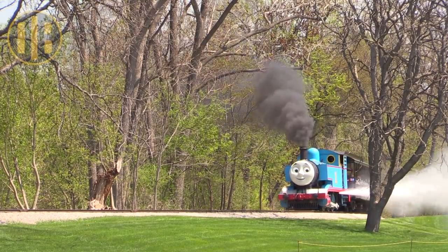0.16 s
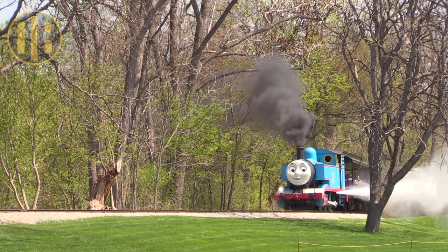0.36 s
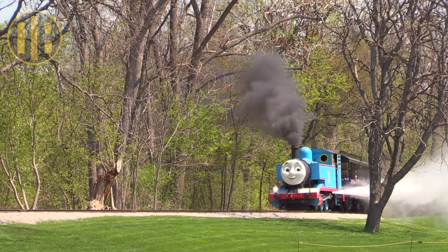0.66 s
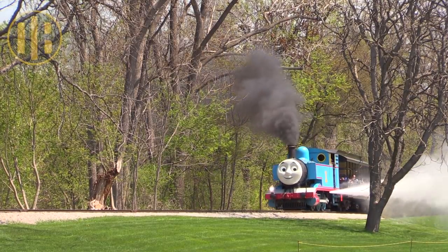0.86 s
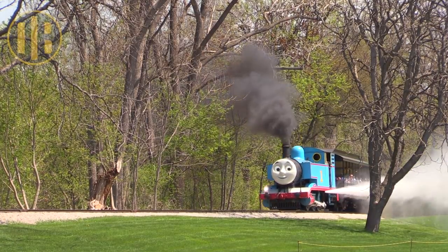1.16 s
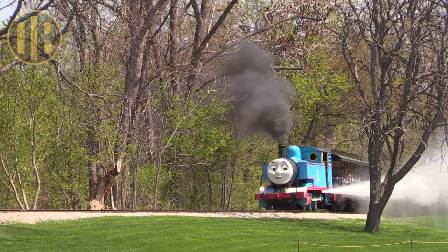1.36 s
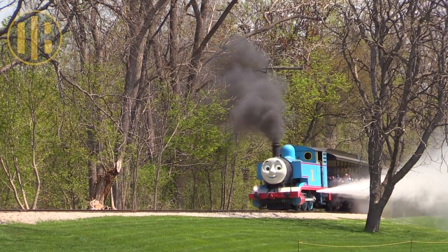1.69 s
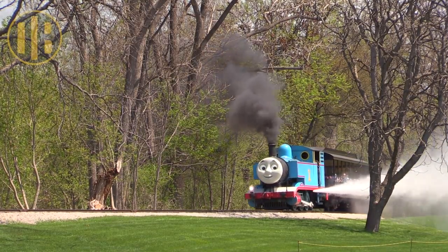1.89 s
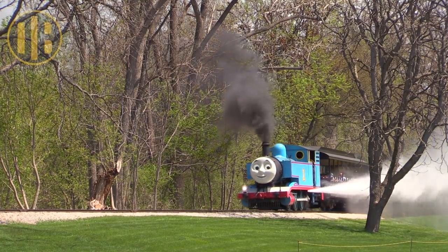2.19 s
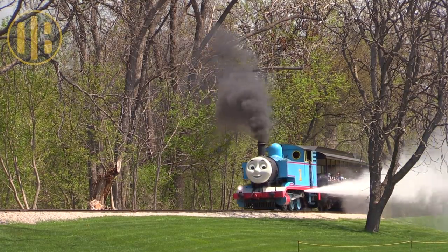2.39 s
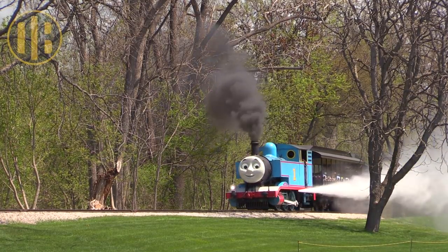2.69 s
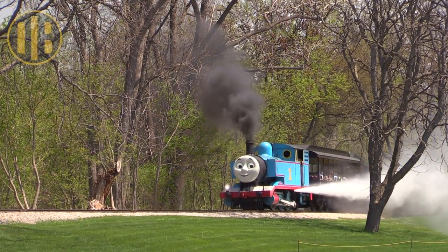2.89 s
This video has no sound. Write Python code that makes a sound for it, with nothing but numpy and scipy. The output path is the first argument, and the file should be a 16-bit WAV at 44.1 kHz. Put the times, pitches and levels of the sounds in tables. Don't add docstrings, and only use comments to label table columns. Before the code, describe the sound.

A steam locomotive blows a loud continuous jet of steam outdoors beside a lawn; the hiss starts slightly weaker and brighter, swells quickly, then wavers and dulls late, over a faint low rumble, heard dry in mono.

```python
import sys
import numpy as np
from scipy import signal
from scipy.fft import rfft, irfft, next_fast_len
from scipy.io import wavfile

SR = 44100
rng = np.random.default_rng(int(sys.argv[2]) if len(sys.argv) > 2 else 0)


def wrap_up_sound(samples):
    columns = np.atleast_2d(samples).T
    tamed = np.clip(columns, -1, 1)
    steps = np.round(tamed * 32767).astype(np.int16)
    wavfile.write(sys.argv[1], SR, steps)


def voltage_ratio(decibels):
    exponent = np.asarray(decibels, float) / 20
    return 10 ** exponent


N = 134505


def jet():
    # (time [s], strength [dB], clarity of the path [dB],
    # low eddy pitch [Hz], high eddy pitch [Hz])
    jet_course = [(0, -20, 8.5, 805, 3230), (.2, -17.5, 6.5, 2200, 3560), (.38, -15.5, 1.5, 2190, 3770),
                  (.55, -16, 4.5, 2200, 3330), (.7, -17, 3, 1430, 3850), (.82, -15, 0, 1390, 2860),
                  (1.0, -17, 1.5, 1230, 2730), (1.2, -17, -1, 1110, 2600), (1.4, -16.5, 0.5, 950, 3120),
                  (1.55, -15.5, 1.5, 1000, 3400), (1.72, -14.5, 2.5, 990, 3000),
                  (1.9, -16, 4.5, 1050, 2500), (2.1, -15, 1, 1580, 3280), (2.3, -16, -0.5, 1480, 2430),
                  (2.5, -16, -3, 1220, 2030), (2.72, -15.5, -6.5, 1230, 2020),
                  (2.88, -16, -4.5, 1500, 2700), (3.05, -18, 3, 1440, 2520)]
    # (frequency [Hz], spectral density [dB per Hz])
    jet_colour = [(450, -8.5), (1150, -1), (2700, -1), (3500, -4.5), (4500, -15), (6500, -30), (9500, -50),
                  (15000, -76)]
    trim_db, low_slope_db = 4, 17
    veil_hz, veil_power = 4540, 1.87
    patch_db, patch_rate_hz = 0.95, 3.2
    flicker_db, flicker_rate_hz = 0.42, 35

    level_db, clarity_db, low_hz, high_hz = in_time(jet_course)
    spectrum, octave, size = coloured(jet_colour, low_slope_db, 0)
    centres = np.arange(8.5, 14, 1 / 6)
    place = np.clip(octave, centres[0], centres[-1])
    hiss = 0
    for centre in centres:
        window = np.clip(1 - 6 * np.abs(place - centre), 0, 1)
        band = irfft(spectrum * window, size)[:N]
        veil = min(2 ** centre / veil_hz, 1) ** veil_power
        humps_db = eddy_hump(centre, low_hz, 0.29) + eddy_hump(centre, high_hz, 0.17)
        gain_db = veil * (clarity_db - clarity_db.mean())
        gain_db = gain_db + humps_db - humps_db.mean()
        gain_db = gain_db + patch_db * drift(patch_rate_hz)
        gain_db = gain_db + flicker_db * drift(flicker_rate_hz)
        hiss = hiss + band * voltage_ratio(gain_db)
    return hiss * voltage_ratio(level_db + trim_db)


def eddy_hump(centre, pitch_hz, width_oct):
    return 4.0 * np.exp(-0.5 * ((centre - np.log2(pitch_hz)) / width_oct) ** 2)


def rumble():
    # (time [s], level [dB])
    draught = [(0, -19), (.04, -23.5), (.12, -24.5), (.3, -25.5), (.55, -28), (.9, -28.5), (1.3, -28.5),
               (1.48, -26), (1.6, -29), (2.15, -28.5), (2.3, -32), (2.45, -28), (2.65, -32), (2.85, -29),
               (3.05, -30)]
    # (frequency [Hz], spectral density [dB per Hz])
    rumble_colour = [(25, -23), (50, -5), (125, -1.5), (180, -5), (240, -17.5), (450, -13.5), (800, -12.5)]
    spectrum, _, size = coloured(rumble_colour, 12.0, 24.0)
    level_db, = in_time(draught)
    return irfft(spectrum, size)[:N] * voltage_ratio(level_db)


def coloured(points, below_db, above_db):
    size = next_fast_len(N)
    octave = np.log2(np.maximum(np.arange(size // 2 + 1) * SR / size, 1))
    hz, db = np.transpose(points)
    at = np.log2(hz)
    shape_db = np.interp(octave, at, db)
    shape_db = shape_db - below_db * np.maximum(at[0] - octave, 0)
    shape_db = shape_db - above_db * np.maximum(octave - at[-1], 0)
    spectrum = rfft(rng.standard_normal(size)) * voltage_ratio(shape_db)
    return spectrum / irfft(spectrum, size).std(), octave, size


def drift(rate_hz):
    hop = 40
    pole = np.exp(-2 * np.pi * rate_hz * hop / SR)
    noise = rng.standard_normal(N // hop + 2002)
    slow = signal.lfilter([1], [1, -2 * pole, pole * pole], noise)[2000:]
    return np.interp(np.arange(N) / hop, np.arange(len(slow)), slow / slow.std())


def in_time(rows):
    times, *columns = np.transpose(rows)
    return [np.interp(np.arange(N) / SR, times, column) for column in columns]


def scene():
    return (jet() + rumble())[None]


def low_pass(x):
    return signal.sosfilt(signal.butter(12, 15850, fs=SR, output="sos"), x)


def record(dry):
    knee, ceiling = 0.59, 1
    knee_slope = 0.85
    room = ceiling - knee
    over = np.maximum(np.abs(dry) - knee, 0)
    squashed = room * np.tanh(knee_slope * over / room)
    mix = dry - np.sign(dry) * (over - squashed)
    return low_pass(mix)


dry = scene()
out = record(dry)
wrap_up_sound(out)
```